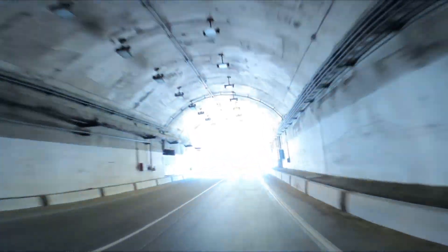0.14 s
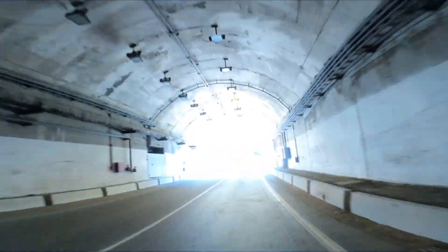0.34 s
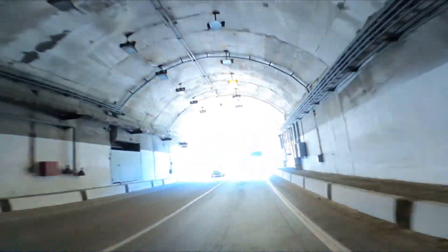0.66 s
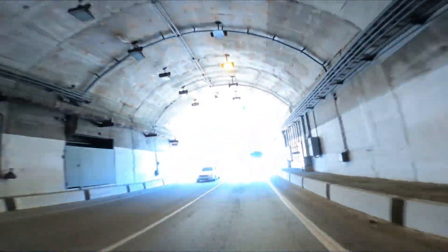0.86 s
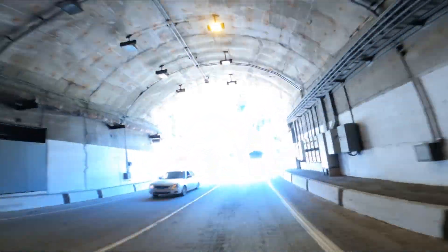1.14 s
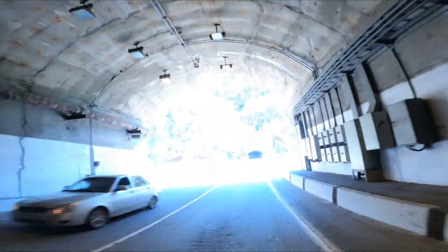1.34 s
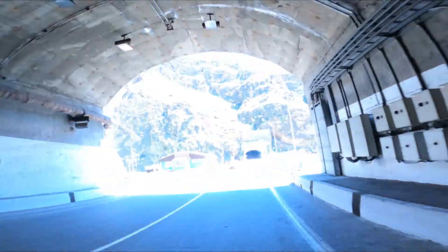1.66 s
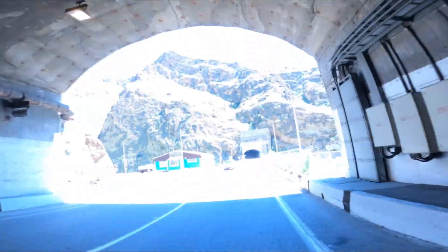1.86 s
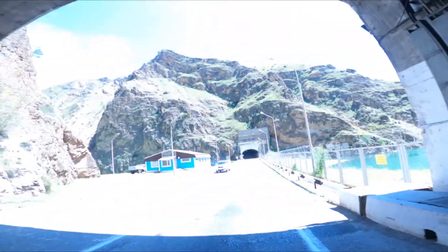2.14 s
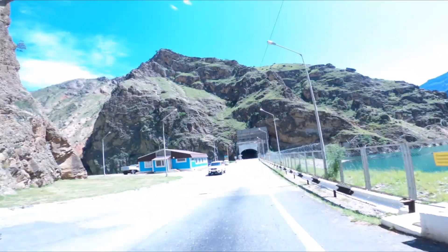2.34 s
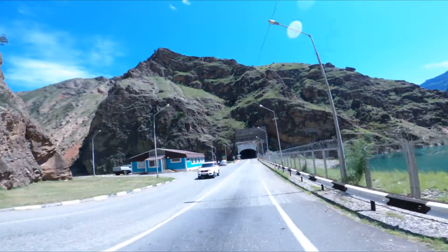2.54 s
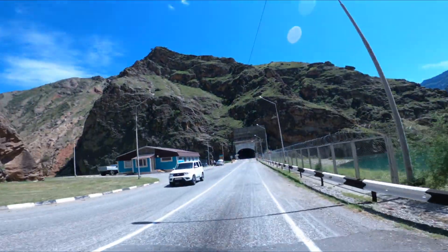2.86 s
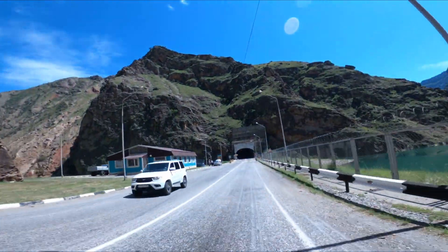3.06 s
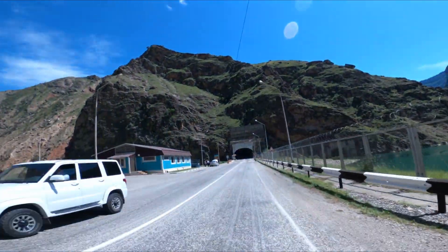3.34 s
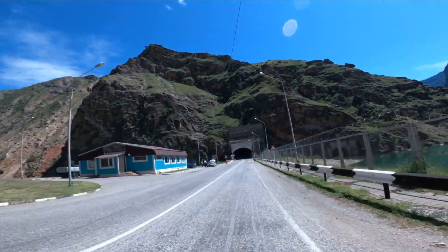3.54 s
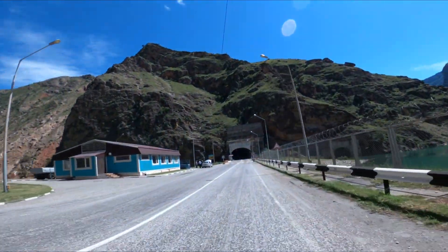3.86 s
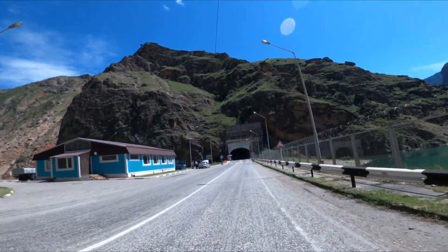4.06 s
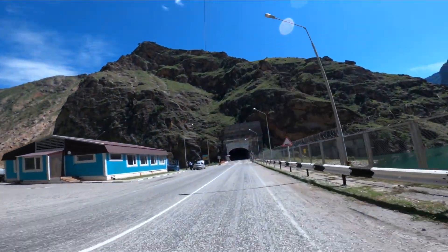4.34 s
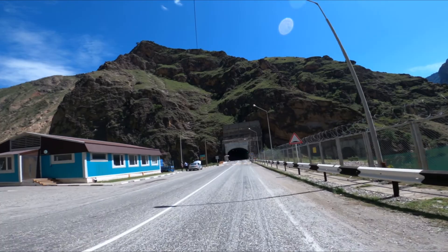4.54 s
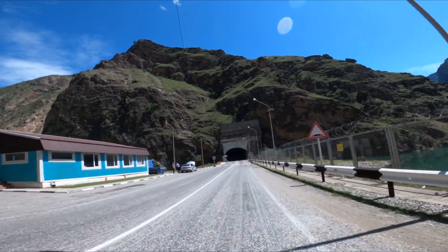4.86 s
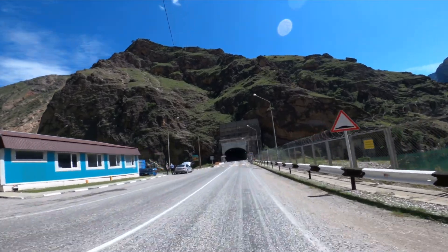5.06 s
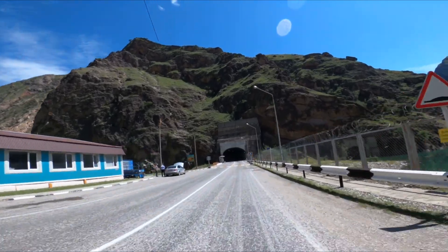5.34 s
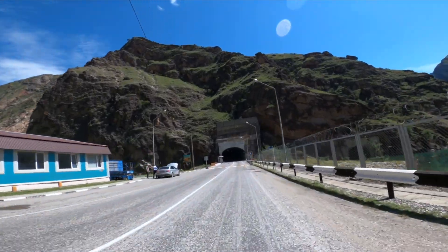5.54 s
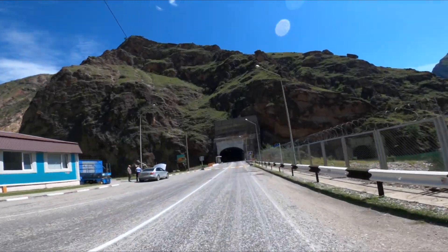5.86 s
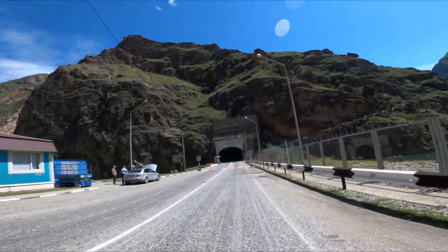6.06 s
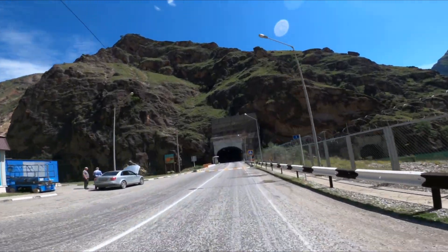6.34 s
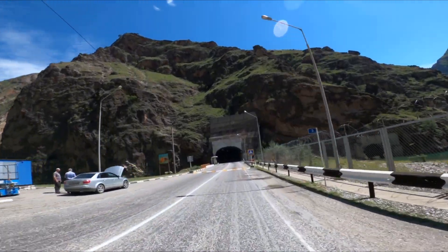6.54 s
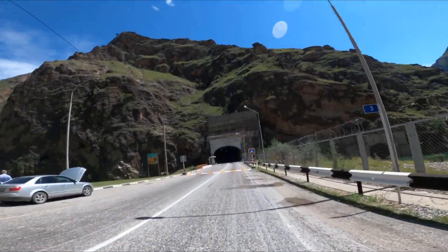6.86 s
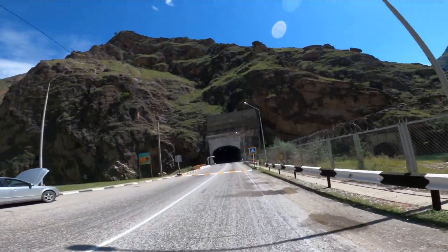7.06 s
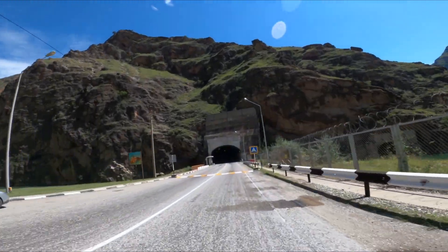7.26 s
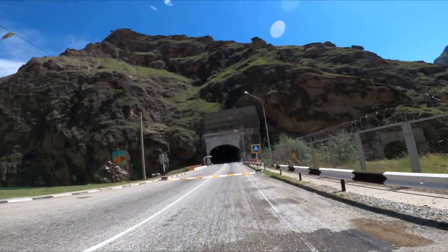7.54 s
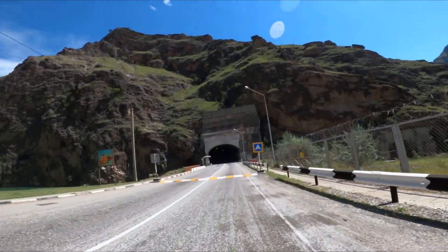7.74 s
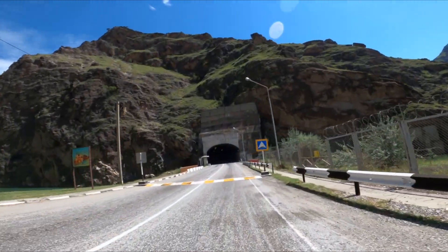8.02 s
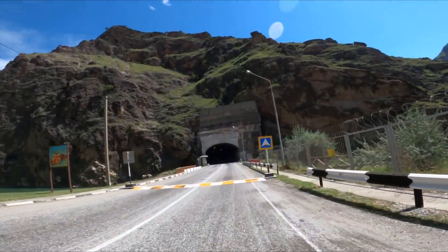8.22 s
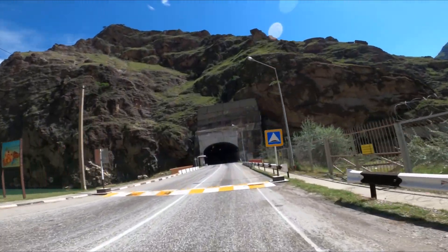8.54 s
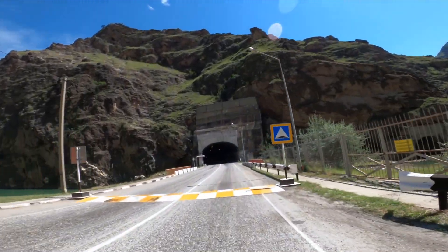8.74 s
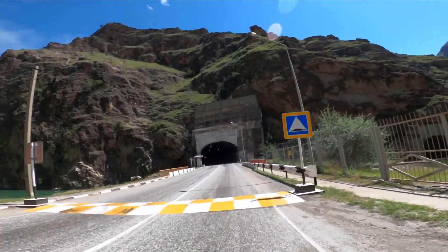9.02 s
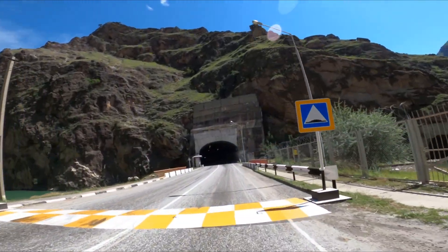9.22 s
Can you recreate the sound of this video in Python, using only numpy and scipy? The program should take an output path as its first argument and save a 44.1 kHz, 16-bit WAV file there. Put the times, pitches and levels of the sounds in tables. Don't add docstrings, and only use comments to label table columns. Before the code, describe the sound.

A car roars through an echoing tunnel with exhaust drone and heavy wind rumble, bursts into open air, passes a car, then slows with faint brake scrape.

```python
import sys
import numpy as np
from scipy import signal
from scipy.io import wavfile
from scipy.ndimage import uniform_filter1d

SR = 44100
rng = np.random.default_rng(int(sys.argv[2]) if len(sys.argv) > 2 else 0)


def unload_wav(signal):
    wavfile.write(
        sys.argv[1],
        SR,
        np.round(np.clip(np.atleast_2d(signal).T, -1, 1) * 32767).astype(np.int16),
    )


def convert_level_to_amplitude(level_db):
    exponent = np.asarray(level_db, float) / 20
    return 10 ** exponent


N = 414099

# f/Hz, density/dB
BUFFET_SPECTRUM = [(6, -30), (10, -3.5), (25, -2), (50, 2.5), (85, 1.5), (110, -4.5), (140, -23.5),
                   (200, -66.5)]
# f/Hz, density/dB
BOOM_SPECTRUM = [(70, -36.5), (95, -5.5), (120, 0), (160, -3.5), (205, -8.5), (250, -24), (330, -64)]
# f/Hz, density/dB
PANEL_SPECTRUM = [(150, -42), (200, 1), (235, -0.5), (300, -2.5), (340, -8), (400, -16.5), (520, -60.5)]
# f/Hz, density/dB
ROAR_SPECTRUM = [(230, -40), (320, -21.5), (370, 0), (480, -2), (650, -6), (960, -7.5), (1250, -11.5),
                 (1600, -19), (2000, -38.5)]
# f/Hz, density/dB
CONTACT_SPECTRUM = [(1100, -21), (1500, -3), (1900, -4), (2500, -8), (3600, -12), (4100, -14.5),
                    (4700, -28)]
# f/Hz, density/dB
AIR_SPECTRUM = [(3600, -33.5), (4200, -6.5), (4600, -3), (5000, -2), (5400, -1.5), (5700, -7), (6100, -9.5),
                (6600, -13), (7300, -27)]
# f/Hz, density/dB
ECHO_SPECTRUM = [(5400, -32.5), (6300, -11), (7000, -2.5), (7800, -4), (8500, -4.5), (9200, -9.5),
                 (10000, -14.5), (11500, -22.5), (13000, -31), (15000, -46.5)]

# t/s, speed/(m/s)
SPEED = [(0, 13), (2.5, 24.4), (4.5, 15), (6.2, 18), (7.7, 9.56), (9.39, 8.6)]
CRUISE_M_S = 16
# level at cruise/dB, change per halved speed/dB,
# share of jolts/1, share of lulls/1, eddy lumps/dB
SHAKING = [
    (-19.5, -0.54, 0.13, 1.1, 0),
    (-24, -1.5, 0.42, .9, -2),
    (-29, -5.5, 0.93, 0.3, 1.5),
]
# t/s, level/dB, half length/s
JOLTS = [(.21, 6.5, 0.029), (.97, 4.5, 0.054), (1.3, 2, 0.36), (1.9, 4.5, 0.12), (2.3, 1, 0.027),
         (3.55, 1.5, 0.17), (3.9, 7.5, 0.031), (4.5, 5, 0.08), (5.25, 5, 0.086), (5.87, 8.5, 0.016),
         (6.02, 3.5, 0.063), (6.6, 3.5, 0.066), (7.05, 1.5, 0.21), (7.5, 3, 0.24), (8.47, 5.5, 0.15),
         (9.3, -5.5, 0.059), (.45, -6, 0.036), (2.98, 0.5, .04), (3.2, -0.5, .08), (4.92, 2.5, 0.2),
         (5.62, -1.5, 0.28), (7.24, -2.5, 0.066), (7.9, -2, 0.22), (8.6, 7.5, 0.014), (9.08, -2.5, 0.11)]
# t/s, level/dB, half length/s
LULLS = [(.29, -17, 0.018), (1.41, -9, 0.005), (2.24, -4, 0.014), (3.03, -12, 0.019), (4.0, -4.5, 0.015),
         (5.55, 3, 0.015), (5.69, -2.5, .02), (6.27, -3, 0.015), (6.92, -3, 0.018), (7.24, -9, 0.0078),
         (8.04, -4, 0.033), (8.68, -7, 0.0082), (9.15, -1, .03), (9.39, -6, 0.012)]

# level at cruise in the open/dB, change per halved speed/dB,
# share of walls/1, share of passes/1
ROLLING = [
    (-34, -6.5, 1.06, 0.9),
    (-46.5, -6.5, 1.26, .9),
    (-55.5, -5, 1.1, 0.84),
    (-67, -6, 1.1, 1.1),
]
# t/s, gain/dB
WALLS = [(0, 8), (.35, 7), (1.1, 5), (1.6, 3), (2.2, 0.5), (2.65, 0.5), (3.12, 0), (3.7, 0.5), (3.9, 0),
         (4.1, 0), (4.4, 0.5), (5.3, -0.5), (5.7, -1.5), (6.2, -2), (7.7, -0.5), (8.4, 0.5), (8.8, -1),
         (9.39, -0.5)]
# closest t/s, gain/dB, approach/s, leaving/s
PASSES = [
    (0.843, 2.002, 0.22, 0.11),
    (3.454, 5, 0.23, 0.32),
]
# t/s, level/dB, half length/s
GAPS = [(2.22, -4.5, .05), (4.12, -5, .03), (4.27, -2, .03), (4.58, 0, .03), (5.12, -3, .04),
        (5.41, 0, .02), (5.55, -4, .05), (5.72, -3, .04), (5.93, -2, .04), (6.15, -2, .03), (6.69, -1, .03),
        (6.98, -4, .07)]

# t/s, f/Hz, level/dB
DRONE = [
    (0, 156, -33),
    (.5, 158, -31),
    (.9, 160, -31),
    (1.4, 161, -34),
    (1.8, 164, -31),
    (2.2, 165, -33),
    (2.6, 167, -42),
]
# multiple/1, level/dB
DRONE_ORDERS = [
    (.5, -4),
    (1, 3),
    (1.5, -8),
    (2, -7),
]
# start t/s, end t/s, start f/Hz, end f/Hz, width/Hz, level/dB
WHISTLES = [(0.4, 1.4, 3620, 3590, 90, -52.5), (1.1, 1.95, 7900, 7500, 500, -68),
            (3.15, 3.8, 10000, 8600, 1500, -69), (9.0, 9.5, 1150, 1300, 220, -50.5),
            (8.1, 9.4, 3700, 3500, 1800, -59.5), (3.1, 4.0, 2000, 1700, 900, -45.5),
            (0.05, 2.1, 1000, 920, 350, -34.5), (1.9, 4.1, 950, 850, 450, -39.5),
            (2.82, 3.41, 2560, 3560, 680, -49), (4.2, 5.9, 1570, 1473, 50.4, -54.5),
            (7.7, 8.6, 1000, 970, 160, -52)]

# t/s, peak level/dB, f/Hz
KNOCKS = [
    (2.2344, -36, 1580),
    (8.417, -50, 1500),
    (8.498, -51.5, 1790),
    (9.0047, -41, 2500),
    (9.0773, -35.5, 2300),
]
# t/s, f/Hz, level/dB
GRABS = [
    (8.02, 2430, -61),
    (8.27, 2370, -60),
    (8.5, 2450, -63),
    (8.68, 2440, -57),
    (8.95, 2370, -54),
    (9.28, 2430, -54.5),
]
GRAB_S, RUB_DB = 0.065, -64
SCRAPE_FROM_S, SCRAPE_DB, SCRAPE_DB_PER_S = 7.9, -62.5, 8.5


def read_spectrum_db(points, hz):
    f, level = np.transpose(points)
    return np.interp(np.log(hz + 1), np.log(f + 1), level, left=-120, right=-120)


def column(rows, k, t):
    rows = np.asarray(rows)
    return np.interp(t, rows[:, 0], rows[:, k])


def bumps_db(rows, t):
    coarse = t[::64]
    total = sum(db * np.exp(-0.5 * ((coarse - s) / half) ** 2) for s, db, half in rows)
    return np.interp(t, coarse, total)


def halvings(t):
    return np.log2(CRUISE_M_S / np.maximum(column(SPEED, k=1, t=t), 1))


def evened(x):
    return x / np.sqrt(np.mean(x ** 2) + 1e-20)


def noise(spectrum, size, patchy_db):
    frames, hz = 4 * N // size + 5, np.fft.rfftfreq(size, 1 / SR)
    a, b, patches = rng.standard_normal((frames, len(hz), 3)).T
    patches = uniform_filter1d(patches, size=10, axis=0)
    patches = evened(uniform_filter1d(patches, size=8, axis=1))
    level_db = read_spectrum_db(spectrum, hz)[:, None] + patchy_db * patches
    z = (a + 1j * b) * convert_level_to_amplitude(level_db)
    wave = signal.istft(z, nperseg=size, noverlap=size * 3 // 4)[1]
    return evened(wave[:N])


def gusts(hz):
    lowpass = signal.butter(2, hz, fs=SR, output="sos")
    return evened(signal.sosfilt(lowpass, rng.standard_normal(N)))


def resonate(x, hz, width_hz):
    turn = np.exp(2j * np.pi * np.cumsum(hz) / SR)
    r = np.exp(-np.pi * width_hz / SR)
    slow = signal.lfilter([1 - r], [1, -r], x / turn)
    slow = signal.lfilter([1 - r], [1, -r], slow)
    return (turn * slow).real


def held(x, span_s, depth):
    span = int(span_s * SR)
    power = uniform_filter1d(uniform_filter1d(x ** 2, span), span)
    return evened(x / (abs(power) + 1e-3) ** (depth / 2))


def wind(t):
    buffet = held(noise(BUFFET_SPECTRUM, size=8192, patchy_db=-3.0), span_s=0.03, depth=0.54)
    boom = held(noise(BOOM_SPECTRUM, size=4096, patchy_db=2.25), span_s=0.026, depth=0.37)
    panel = held(noise(PANEL_SPECTRUM, size=4096, patchy_db=1.75), span_s=0.042, depth=0.58)
    panel = panel * convert_level_to_amplitude(0.88 * gusts(46))
    slower, jolt, lull = halvings(t), bumps_db(JOLTS, t), bumps_db(LULLS, t)
    eddy = gusts(7.8)
    lumps = (eddy, eddy, gusts(7.5))
    out = np.zeros(N)
    for settings, lump, layer in zip(SHAKING, lumps, (buffet, boom, panel)):
        db, per_halving_db, jolt_share, lull_share, lump_db = settings
        level_db = db + per_halving_db * slower + jolt_share * jolt + lull_share * lull + lump_db * lump
        out += convert_level_to_amplitude(level_db) * layer
    return out


def tyres(t):
    texture = gusts(28)
    roar = noise(ROAR_SPECTRUM, size=2048, patchy_db=0.43)
    roar = roar * convert_level_to_amplitude(0.41 * texture + 0.13 * bumps_db(JOLTS, t))
    contact = noise(CONTACT_SPECTRUM, size=1024, patchy_db=0.17)
    contact = contact * convert_level_to_amplitude(0.41 * texture + 0.45 * gusts(6.7))
    air = noise(AIR_SPECTRUM, size=1024, patchy_db=1.0) * convert_level_to_amplitude(0.5 * texture)
    echo = noise(ECHO_SPECTRUM, size=1024, patchy_db=0.0)
    echo = echo * convert_level_to_amplitude(0.5 * texture + bumps_db(GAPS, t) + 0.82 * gusts(6))
    passing = np.zeros(N)
    for closest_s, db, come_s, go_s in PASSES:
        span_s = np.where(t < closest_s, come_s, go_s)
        passing += db * np.exp(-((t - closest_s) / span_s) ** 2)
    slower, walls = halvings(t), column(WALLS, k=1, t=t)
    out = np.zeros(N)
    for settings, layer in zip(ROLLING, (roar, contact, air, echo)):
        db, per_halving_db, wall_share, pass_share = settings
        level_db = db + per_halving_db * slower + wall_share * walls + pass_share * passing
        out += convert_level_to_amplitude(level_db) * layer
    return out


def exhaust(t):
    hz = column(DRONE, k=1, t=t) * (1 + 0.0062 * gusts(6.8))
    turns = np.cumsum(hz) / SR
    orders = np.zeros(N)
    for multiple, db in DRONE_ORDERS:
        orders += convert_level_to_amplitude(db + 2.6 * gusts(7)) * np.sin(2 * np.pi * multiple * turns)
    fade = np.clip((DRONE[-1][0] - t) / 0.18, 0, 1)
    return np.sqrt(2) * convert_level_to_amplitude(column(DRONE, k=2, t=t)) * orders * fade


def whistles(t):
    out = np.zeros(N)
    for start_s, end_s, start_hz, end_hz, width_hz, db in WHISTLES:
        on = (t > start_s) & (t < end_s)
        done = (t[on] - start_s) / (end_s - start_s)
        hz = start_hz + (end_hz - start_hz) * done
        ring = resonate(rng.standard_normal(on.sum()), hz, width_hz)
        out[on] += convert_level_to_amplitude(db) * np.sin(np.pi * done) ** 0.81 * held(ring, span_s=0.04, depth=0.6)
    return out


def brake(t):
    ring = resonate(rng.standard_normal(N), column(GRABS, k=1, t=t), width_hz=85)
    ring = held(ring, span_s=0.03, depth=0.4)
    press = np.clip((t - GRABS[0][0]) / 0.3 + 1, 0, 1)
    grabs = [(s, db - RUB_DB, GRAB_S) for s, hz, db in GRABS]
    out = convert_level_to_amplitude(RUB_DB + bumps_db(grabs, t)) * press * ring
    scrape_db = SCRAPE_DB + SCRAPE_DB_PER_S * (t - SCRAPE_FROM_S) + 1.5 * gusts(9.9)
    out += convert_level_to_amplitude(scrape_db) * press * noise(CONTACT_SPECTRUM, size=512, patchy_db=0.7)
    for s, db, hz in KNOCKS:
        age_s = np.maximum(t - s, 0)
        out += convert_level_to_amplitude(db - 1) * np.exp(-age_s / 0.0022) * np.sin(2 * np.pi * hz * age_s)
    return out


def scene():
    t = np.arange(N) / SR
    return (wind(t) + tyres(t) + exhaust(t) + whistles(t) + brake(t))[None]


def top_cut(x):
    return signal.sosfilt(signal.butter(12, 14200, fs=SR, output="sos"), x)


def record(dry):
    knee = 0.6
    rounded = dry / (1 + (dry / knee) ** 4) ** 0.25
    return top_cut(rounded)


dry = scene()
out = record(dry)
unload_wav(out)
```